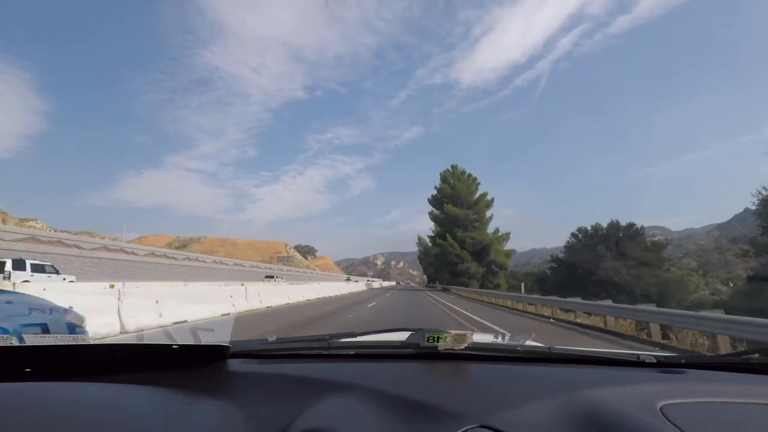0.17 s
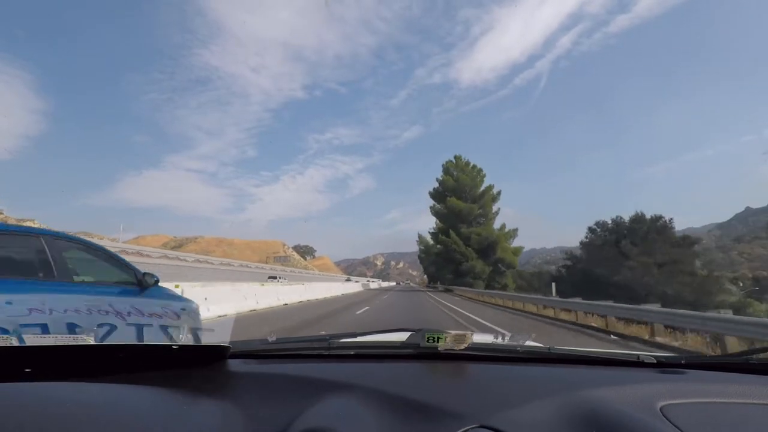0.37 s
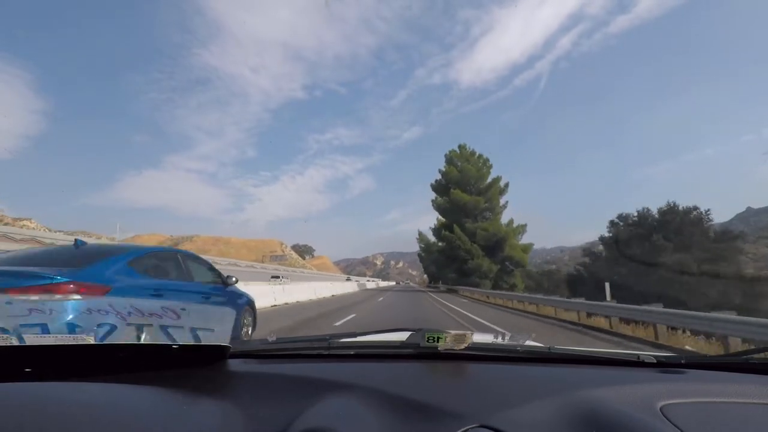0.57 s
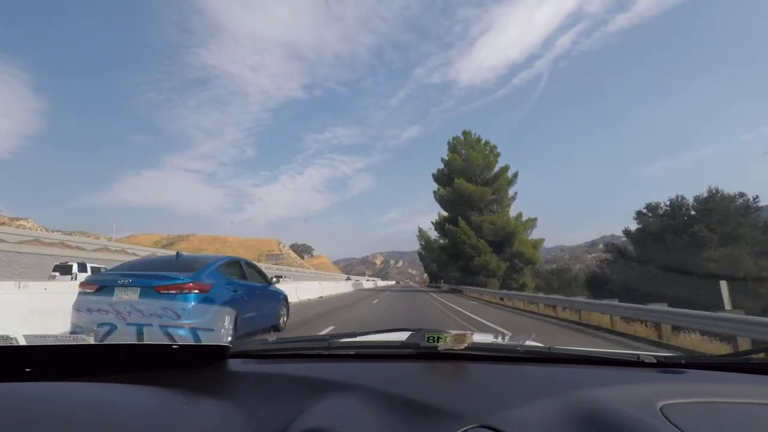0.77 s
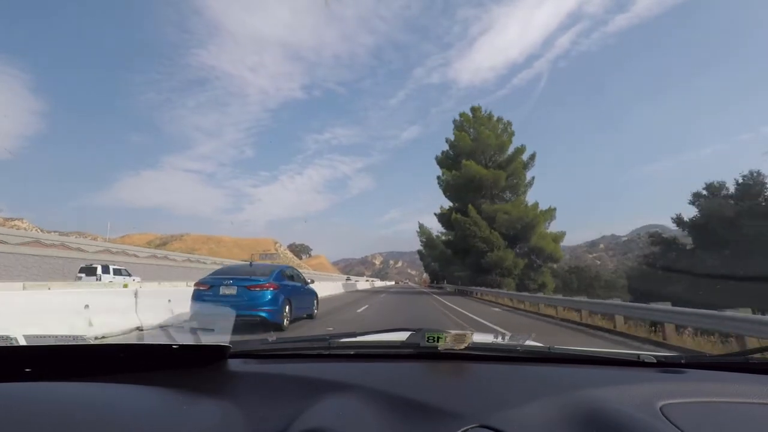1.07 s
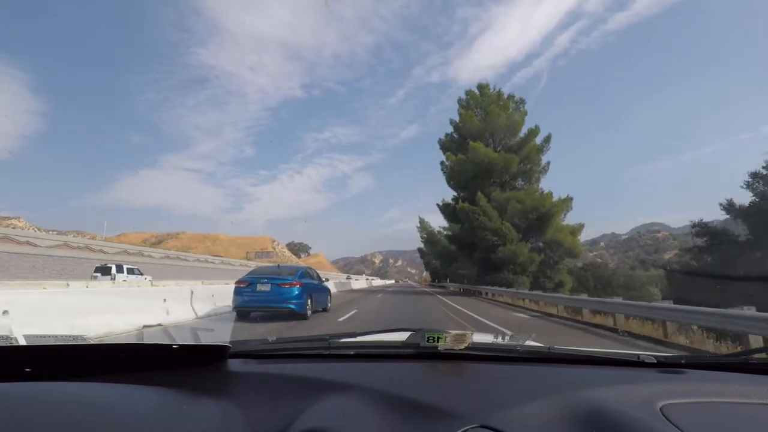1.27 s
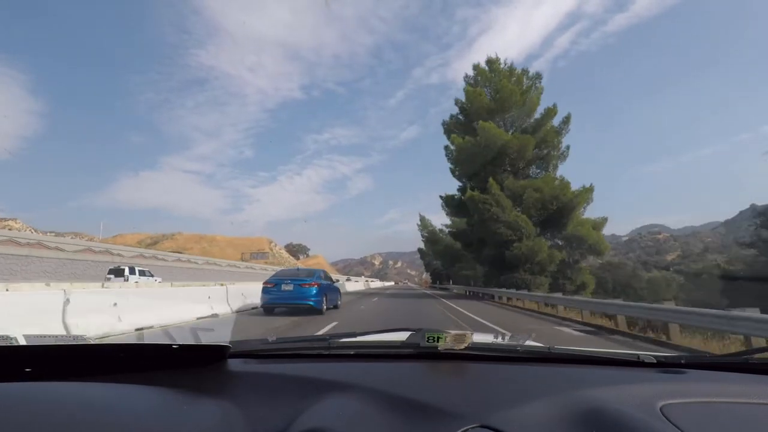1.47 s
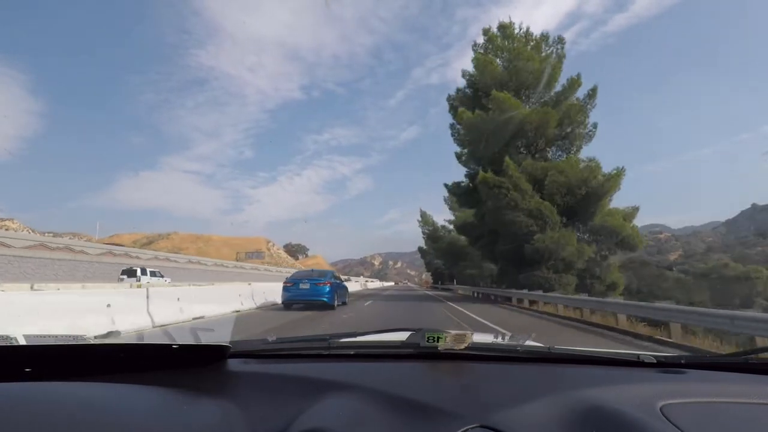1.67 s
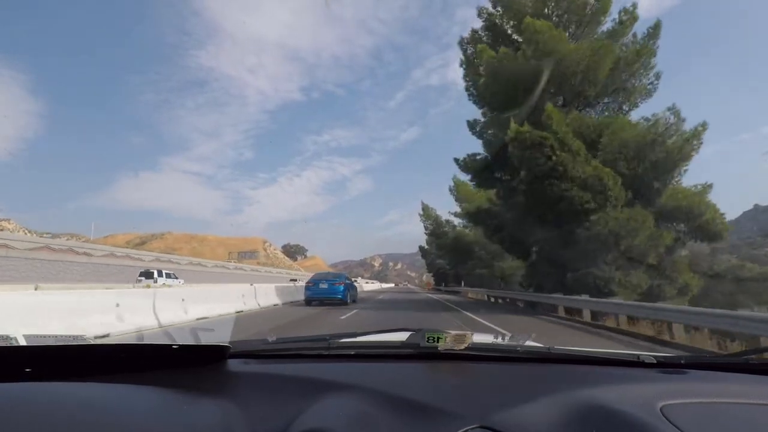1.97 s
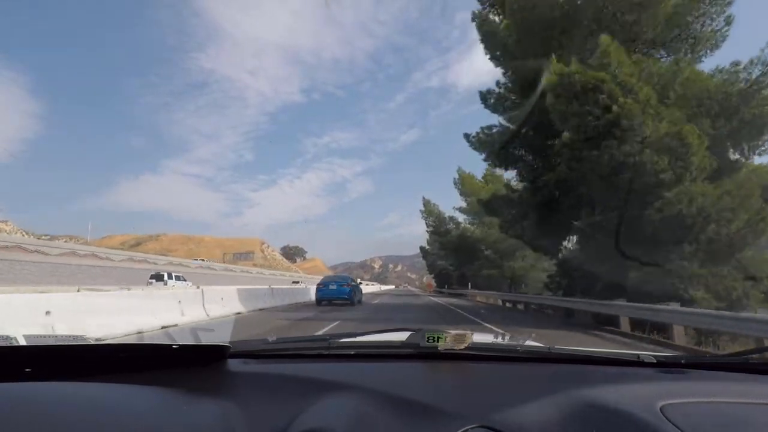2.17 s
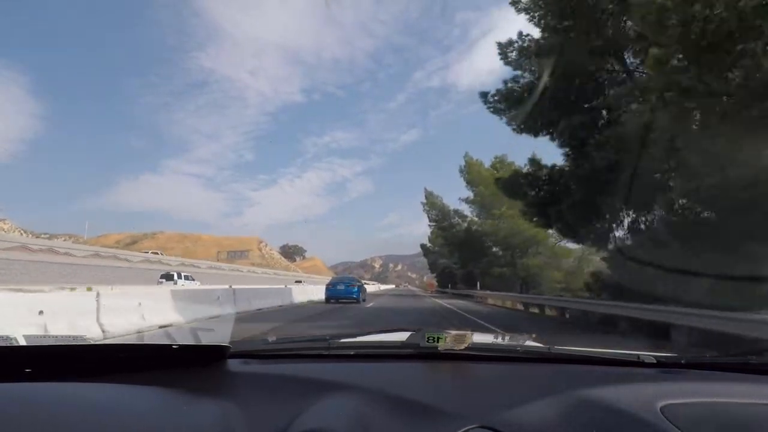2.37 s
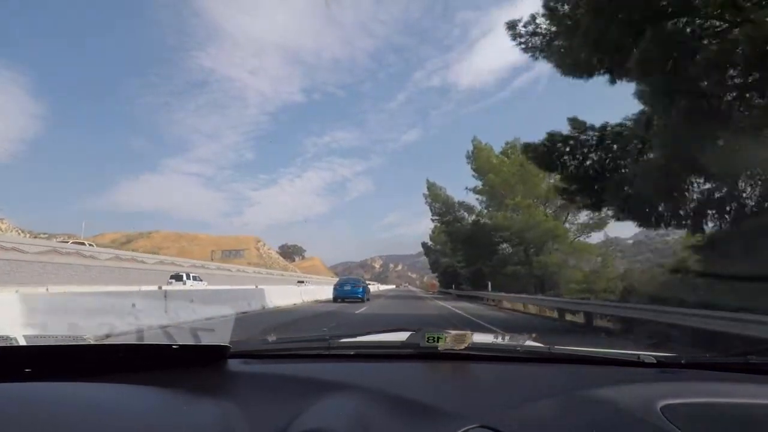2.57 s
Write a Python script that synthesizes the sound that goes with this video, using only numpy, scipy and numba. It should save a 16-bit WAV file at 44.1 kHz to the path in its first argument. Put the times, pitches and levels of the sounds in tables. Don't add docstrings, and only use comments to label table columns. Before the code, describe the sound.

Dragging metal exhaust pipe scrapes gritty asphalt and knocks, heard inside a rumbling car on a highway

```python
import sys
import numpy as np
from scipy import signal
from scipy.fft import rfft, irfft
from scipy.io import wavfile
from numba import njit

SR = 44100
rng = np.random.default_rng(int(sys.argv[2]) if len(sys.argv) > 2 else 0)


def natural_amplitude(level_db):
    exponent = np.asarray(level_db, float) / 20
    return 10 ** exponent


def digitize_waveform(pressure):
    field = np.atleast_2d(pressure).T
    bounded = np.clip(field, -1, 1)
    quanta = np.round(bounded * 32767).astype(np.int16)
    wavfile.write(sys.argv[1], SR, quanta)


N = 120834


def rms_one(x):
    return x / np.sqrt(np.mean(x ** 2) + 1e-20)


def in_time(rows):
    seconds, *columns = np.transpose(rows)
    return [np.interp(np.arange(N) / SR, seconds, column) for column in columns]


def at_hz(points, hz):
    point_hz, value = np.transpose(points)
    return np.interp(np.log(hz), np.log(point_hz), value)


def panned(db):
    return natural_amplitude(np.array([[db / 2], [-db / 2]]))


def drift(rate):
    pole = np.exp(-80 * np.pi * rate / SR)
    noise = rng.standard_normal(N // 40 + 2002)
    slow = signal.lfilter([1], [1, -2 * pole, pole * pole], noise)[2000:]
    return np.interp(np.arange(N) / 40, np.arange(len(slow)), rms_one(slow))


def cut(x, hz, kind, order):
    return signal.sosfilt(signal.butter(order, hz, kind, fs=SR, output="sos"), x)


# multiple, level in dB, how far it follows the load (0 to 1),
# left minus right in dB, wobble in dB.
ORDERS = [
    (1, -8, 0.8, -0.5, -1.24),
    (2, 0.5, 1, -0.86, 0.63),
    (3, -13.5, 1, -5.5, 0.5),
    (4, -21, 0, 7.5, 1.9),
    (5, -25.5, 0.1, 11.5, 3),
    (6, -23.5, 0.2, -4.5, -2),
    (8, -27, 0.8, -5, 5),
    (9, -34, 0.1, -21, 5.2),
]
# time in seconds, rate in Hz.
SPEED = [
    (0, 67.7),
    (.8, 67.5),
    (1.0, 66.7),
    (1.35, 65.8),
    (1.6, 66.3),
    (2.2, 65.7),
    (2.74, 66.0),
]
# time in seconds, level in dB.
LOAD = [
    (0.03, -12),
    (0.37, -14),
    (1.11, -17),
    (1.16, -33.5),
    (1.23, -17.5),
    (1.6, -12),
    (2.58, -13.5),
    (2.7, -12),
]
# time in seconds, level in dB.
ROCK = [(0.03, -25.5), (0.12, -13.5), (0.45, -26.5), (0.49, -31.5), (0.93, -16.5), (1.01, -25), (1.1, -17),
        (1.17, -20), (1.21, -13.5), (1.42, -19), (1.48, -30), (1.71, -19), (2.62, -22), (2.68, -28)]


def engine():
    (rate,), (load_db,), (rock_db,) = in_time(SPEED), in_time(LOAD), in_time(ROCK)
    turn = 2 * np.pi * np.cumsum(rate) / SR
    mean_db = load_db.mean()
    out = 0
    for multiple, db, share, pan_db, wobble_db in ORDERS:
        swing_db = load_db - mean_db if multiple > 1.5 else rock_db - rock_db.mean()
        each_side = 0.23 * np.array([drift(13), drift(26)])
        level_db = 3 + mean_db + db + share * swing_db + wobble_db * (each_side + drift(6.5))
        phase = rng.uniform(0, 6.85) + 0.11 * wobble_db * drift(3.3)
        out = out + natural_amplitude(level_db) * panned(pan_db) * np.sin(np.round(multiple) * turn + phase)
    return out


# time in seconds, level in dB, upper note's share of the total power
# in dB (0 or more: nearly all).
HEAVE = [(0.03, -14.5, -17), (0.13, -14, 2), (0.91, -15.5, -10), (1.17, -15.5, -1), (1.22, -19.5, -2),
         (2.07, -13.5, -1.5), (2.1, -19.5, 1.5), (2.32, -15, -8), (2.35, -21.5, -26.5), (2.42, -15.5, 10.5),
         (2.53, -16, -8), (2.7, -17.5, -20)]


def heave():
    width_hz = 12
    db, upper_db = in_time(HEAVE)
    share = np.clip(natural_amplitude(2 * upper_db), .02, .98)
    turn = 2j * np.pi * np.arange(N) / SR
    notes = []
    for hz in (28, 44):
        waver = 1 + .6 * (drift(width_hz) + 1j * drift(width_hz))
        notes.append(rms_one(np.real(waver * np.exp(hz * turn))))
    low, high = notes
    return natural_amplitude(db) * (np.sqrt(1 - share) * low + np.sqrt(share) * high)


# pitch in Hz, likeness (1 same, -1 opposite).
LIKENESS = [(60, .98), (130, .92), (280, .45), (450, .9), (650, .93), (950, -.4), (2500, .7), (5000, .3)]
# pitch in Hz, left minus right in dB.
PAN = [(60, -11.5), (150, -2), (380, -1.5), (950, -11), (2380, 4.5), (5980, 2.5), (15000, -0.5)]


def coloured(spectrum, patchy_db):
    hz = np.fft.rfftfreq(N, 1 / SR) + 1
    source = irfft(rfft(rng.standard_normal((2, 2, N))) * natural_amplitude(at_hz(spectrum, hz)), N)
    edges = 45 * 2 ** np.arange(0, 8.4, .5)
    out = 0
    for k, (low, high) in enumerate(zip(edges, edges[1:])):
        mid, side = cut(source[k % 2], [low, high], "band", order=2)
        centre = np.sqrt(low * high)
        alike = np.clip(at_hz(LIKENESS, centre), -1, 1)
        gain = natural_amplitude(patchy_db * drift(9.8)) * panned(at_hz(PAN, centre))
        out = out + gain * (np.sqrt(1 + alike) * mid + np.sqrt(1 - alike) * side * [[1], [-1]])
    return rms_one(out)


# pitch in Hz, level in dB per Hz.
ROAD = [(35, -34.5), (60, -12.5), (86, -6.5), (142, -5.5), (182, -8), (554, -17), (743, -31), (4800, -63),
        (9000, -73.5), (11700, -105), (19800, -120)]
# time in seconds, level in dB.
OVERTAKE = [
    (0.03, -23),
    (1.17, -23),
    (1.47, -20.5),
    (1.48, -22),
    (2.04, -24.5),
    (2.07, -24.5),
    (2.3, -27.5),
    (2.7, -24.5),
]


def road():
    roar_db, = in_time(OVERTAKE)
    return natural_amplitude(-20.5 + roar_db - roar_db.mean()) * coloured(ROAD, patchy_db=.8)


# time in seconds, level in dB.
WHINE = [(0.02, -53), (0.09, -49), (0.19, -57), (0.61, -58.5), (0.62, -62.5), (0.98, -55.5), (1.0, -59.5),
         (1.77, -52.5), (1.86, -69), (1.88, -53.5), (2.05, -63.5), (2.12, -48), (2.17, -71), (2.38, -57.5),
         (2.52, -72.5), (2.7, -63.5)]


def whine():
    db, = in_time(WHINE)
    side_phase = np.array([[0], [.6]])
    turn = 2 * np.pi * 2642 * np.arange(N) / SR + 0.91 * drift(9.9) + side_phase
    return natural_amplitude(5.5 + db + 2.7 * drift(17)) * np.sin(turn)


@njit
def bank(clicks, which, gains, r, w, taps):
    out = np.zeros(clicks.shape)
    for m in range(len(r)):
        a, b = 2 * r[m] * np.cos(w[m]), r[m] * r[m]
        for c in range(2):
            y1 = y2 = 0.0
            for i in range(len(which)):
                y = gains[m, which[i]] * clicks[c, i] + a * y1 - b * y2
                out[0, i] += taps[0, m, c, 0] * y + taps[0, m, c, 1] * y1
                out[1, i] += taps[1, m, c, 0] * y + taps[1, m, c, 1] * y1
                y1, y2 = y, y1
    return out


def struck(grit, hz, level_db, t60, s, touch_db, lean_db, shake_db=-33, hold=0.0082, fade=0.033):
    attack_s, impact_s, impact_db = 0.0056, 0.002, 2.5
    t, coarse = np.arange(N) / SR, np.arange(0, N, 16) / SR
    which = np.clip(np.searchsorted(s - attack_s / 2, t) - 1, 0, None)
    age = coarse - s[:, None] + attack_s / 2
    stroke = np.clip(age / attack_s, 0, 1) * np.exp(-np.clip(age - hold, 0, None) / fade)
    stroke += (age > 0) * natural_amplitude(impact_db) * np.exp(-np.abs(age) / impact_s)
    pressure = np.interp(t, coarse, natural_amplitude(touch_db - touch_db.mean()) @ stroke)
    clicks = grit * (pressure + natural_amplitude(shake_db))

    spread_db = 2.6 * np.clip(hz / 6000, .4, 1.8)[:, None]
    colour = spread_db * rng.standard_normal((len(hz), len(s))) + lean_db(hz[:, None])
    gains = np.ascontiguousarray(natural_amplitude(level_db[:, None] + colour) / np.sqrt(t60)[:, None])

    w, alike = 2 * np.pi * hz / SR, np.clip(at_hz(LIKENESS, hz), -1, 1)
    mix = np.sqrt(np.array([1 + alike, 1 - alike]).T)[:, :, None]
    common = rng.uniform(0, 5.5, len(hz))
    port_phase = 0.73 * np.minimum(hz / 2000, 1) * rng.standard_normal(len(hz))
    phase = common + np.array([0 * hz, port_phase])
    taps = np.stack([np.sin(w + phase), -np.sin(phase)], axis=2)[:, :, None, :]
    ports = np.array([mix * taps[0], mix * taps[1] * [[1], [-1]]])
    return rms_one(bank(clicks, which, gains, natural_amplitude(-60 / (t60 * SR)), w, ports))


# start in seconds, peak in dB, brightness in dB per octave, ring of the long
# pipe section in dB, ring of the middle section in dB.
TOUCHES = [(0.0034, -27, -0.5, -17, -20), (0.0359, -32, 0.7, -21.5, -26.5),
           (0.0925, -29.5, -1.5, -12, -26.5), (0.171, -33, 0.2, -21.5, -23),
           (0.2285, -33.5, 1.5, -22, -22.5), (0.362, -37, 2.3, -18.5, -12.5),
           (0.4204, -36, 1.3, -16.5, -18), (0.481, -35.5, 2.5, -16, -9.5),
           (0.5404, -36, 6, -2.5, -14), (0.594, -35, 2.4, -11.5, -17), (0.7584, -42.5, -1.7, -6, -10),
           (0.826, -34, 0.5, -9.5, -23), (0.8774, -35, 0.5, -17, -16),
           (0.9342, -31.5, -0.2, -19, -17), (0.971, -38.5, 3.3, -13.5, -15.5),
           (1.0353, -35, 3.6, -8, -14.5), (1.0854, -32, -1.8, -9.5, -14),
           (1.1194, -35, -0.3, -12, -20.5), (1.157, -38.5, -1.3, -14, -25.5),
           (1.208, -39, -2.3, -15, -20.5), (1.2875, -36, -0.7, -14.5, -14.5),
           (1.4165, -31, 0.6, -15, -22.5), (1.4636, -29.5, 0.59, -21.5, -11.5),
                (1.5943, -30, 0.98, -12, -7), (1.6554, -28, 0.96, -17, -20),
                (1.7524, -37.5, 0.7, -7, -12.5), (1.7815, -34, 0.49, -21.5, -14),
                (1.8268, -35.5, 0.58, -15.5, -16), (1.8727, -29.5, 0.63, -22.5, -24.5),
                (1.988, -31.5, 0.54, -19.5, -23.5), (2.0206, -37, 0.88, -16, -17),
                (2.079, -39, 0.76, -20, -16), (2.1208, -35, 0.6, -16.5, -25), (2.154, -39, 0.51, -23, -27),
                (2.2076, -32, 0.7, -12, -27.5), (2.2295, -35.5, 0.9, -18.5, -23),
                (2.2865, -39, 0.56, -18.5, -22), (2.3416, -35.5, 0.64, -19, -15.5),
                (2.4742, -36.5, 0.63, -12.5, -22), (2.5315, -41.5, 0.7, -17.5, -24.5),
                (2.6282, -33, 0.7, -17, -22.5), (2.6636, -36, 0.7, -19.5, -24.5)]
# pitch in Hz, level in dB.
PIPE = [(1410, -56.5), (1647, -59.5), (2019, -70.5), (2568, -68.5), (2735, -69), (3316, -79.5), (3521, -60),
        (3811, -65.5), (3941, -60.5), (4140, -65.5), (4221, -60), (4694, -60), (4915, -70), (4980, -60)]
SHELL = [(5486, -67), (5787, -66), (6115, -66), (6573, -68), (6794, -69), (7127, -75.5), (7262, -68),
         (7843, -77), (8220, -87), (8446, -97)]
SHIELD = [(8915, -85), (9039, -90), (9701, -102), (9938, -84), (10460, -93), (10917, -99), (11149, -92),
          (11380, -103.5), (11660, -103), (12269, -100), (12985, -107)]
# pitch in Hz, level in dB.
RASP = [(710, -17.5), (1200, 3), (2600, -12), (3070, -10.5), (4830, -8), (6770, -10.5), (8600, -20),
        (11200, -64), (18900, -120)]


def scrapes(grit):
    s, db, tilt_db, long_db, mid_db = np.transpose(TOUCHES)

    def tilted(hz):
        return np.log2(hz / 4500) * tilt_db

    def landed(hz):
        upper = np.where(hz < 1800, mid_db - mid_db.mean(), tilted(hz))
        return np.where(hz < 1500, long_db - long_db.mean(), upper)

    parts = []
    for modes, part_db in ((PIPE, -44), (SHELL, -53.5), (SHIELD, -69)):
        hz, level_db = np.transpose(modes)
        t60 = np.minimum(0.21 * (2600 / hz) ** 0.63, 0.36)
        parts.append(natural_amplitude(part_db) * struck(grit, hz, level_db, t60, s, db, landed))
    pipe, shell, shield = parts
    hz = np.geomspace(1000, 8600, num=44) * rng.uniform(.98, 1.02, size=44)
    rasp_t60 = 0.012 * (4000 / hz) ** 0.38
    rasp = natural_amplitude(-47.5) * struck(grit, hz, at_hz(RASP, hz), rasp_t60, s, db, tilted)
    floor_hz = 8200
    dulled = cut(pipe + shell + rasp, floor_hz, "low", order=8)
    return dulled + cut(shield, [floor_hz, 14500], "band", order=3)


# start in seconds, peak in dB.
THUDS = [(0.038, -5.5), (0.126, -15), (0.256, -14), (0.308, -32.5), (0.372, -15.5), (0.427, -25.5),
         (0.494, -23.5), (0.597, -19), (0.839, -16), (0.896, -30.5), (0.932, -28), (1.005, -18.5),
         (1.059, -13), (1.105, -28.5), (1.177, -15), (1.297, -21.5), (1.33, -32), (1.383, -35),
         (1.422, -22), (1.492, -4.5), (1.545, -19.5), (1.584, -18.5), (1.618, -24), (1.679, -15),
         (1.715, -35.5), (1.745, -17.5), (1.776, -30), (1.835, -19), (1.882, -22), (1.926, -20.5),
         (1.955, -23.5), (2.028, -17.5), (2.096, -13.5), (2.13, -25.5), (2.258, -15.5), (2.306, -28.5),
         (2.354, -38.5), (2.483, -33.5), (2.638, -21.5), (2.713, -19.5)]
# pitch in Hz, level in dB, seconds to fade by 60 dB.
DRUM = [
    (344, 10, 0.065),
    (541.2, 10, 0.16),
    (572.6, 5, 0.29),
    (587.2, 5, .2),
    (716, -32.5, 0.13),
    (980, -18.5, 0.13),
]


def knocks(grit):
    hz, level_db, t60 = np.transpose(DRUM)
    s, db = np.transpose(THUDS)
    drum = struck(grit, hz, level_db, t60, s, db, np.zeros_like, shake_db=-12.5, hold=0.0087, fade=0.013)
    return natural_amplitude(-30.5) * panned(-8) * cut(drum, 743, "low", order=4)


def exhaust():
    clicks_per_s, spread_db = 2500, 2
    size = natural_amplitude(spread_db * np.minimum(rng.exponential(1, (2, N)), 4)) * rng.choice([-1, 1], (2, N))
    grit = size * (rng.random((2, N)) < clicks_per_s / SR) + 1e-12
    return scrapes(grit) + knocks(grit)


# start in seconds, peak in dB.
TICKS = [(0.3294, -57.5), (0.3439, -50), (0.6997, -62), (0.7124, -84), (0.7204, -66), (1.5476, -60.5),
         (1.5606, -57), (1.5765, -55.5), (1.5876, -57.5), (1.7371, -59), (1.938, -54), (1.9544, -64),
         (2.3352, -60.5), (2.3968, -54.5), (2.4082, -66)]


def trim():
    s, db = np.transpose(TICKS)
    clicks = np.full(N, 1e-18)
    clicks[(s * SR).astype(int)] = natural_amplitude(db + 7.5)
    return cut(clicks, 5000, "high", order=2)


def scene():
    return engine() + heave() + road() + whine() + exhaust() + trim()


def band_limit(x):
    return signal.sosfilt(signal.butter(12, 15740, fs=SR, output="sos"), x)


def record(dry):
    ease_s = .001
    ease = np.sin(np.pi / 2 * np.clip(np.arange(N) / SR / ease_s, 0, 1)) ** 2
    return band_limit(1.046 * np.tanh(dry / 0.99) * ease)


dry = scene()
out = record(dry)
digitize_waveform(out)
```